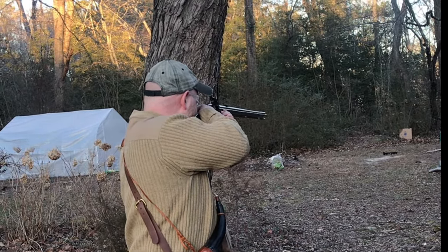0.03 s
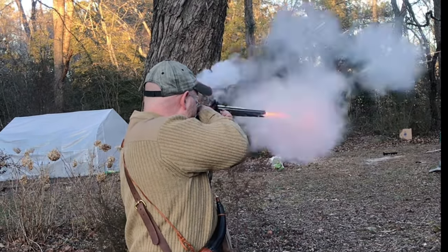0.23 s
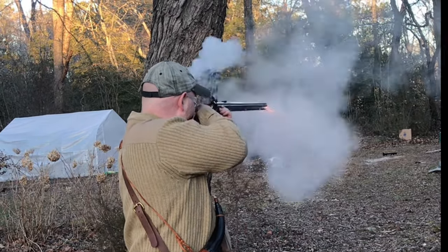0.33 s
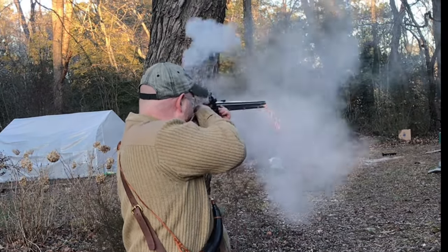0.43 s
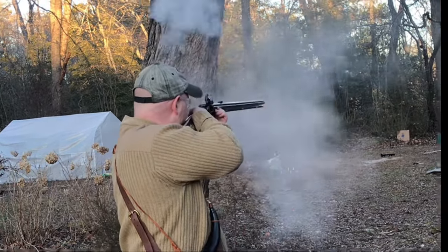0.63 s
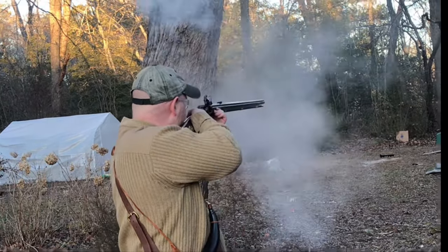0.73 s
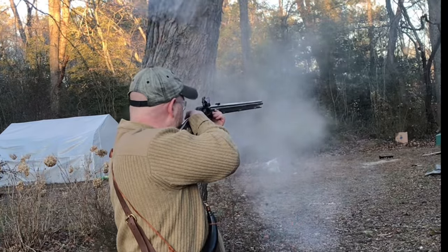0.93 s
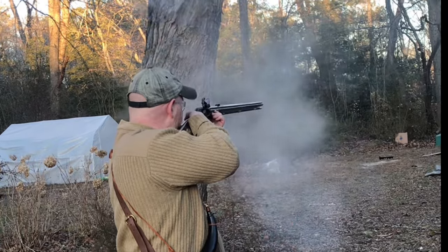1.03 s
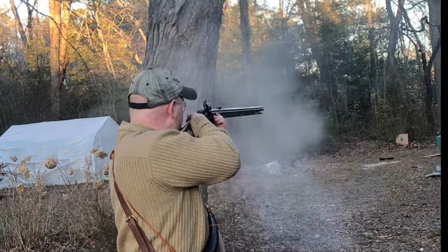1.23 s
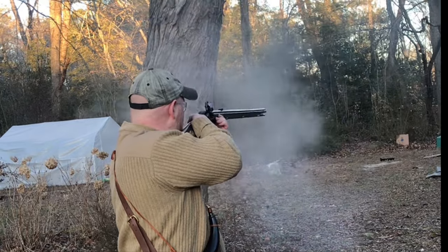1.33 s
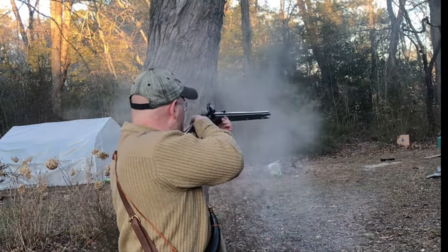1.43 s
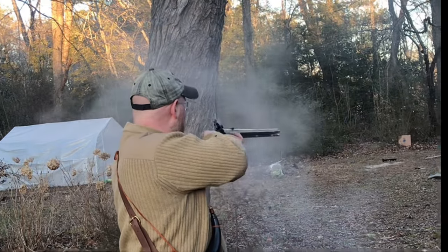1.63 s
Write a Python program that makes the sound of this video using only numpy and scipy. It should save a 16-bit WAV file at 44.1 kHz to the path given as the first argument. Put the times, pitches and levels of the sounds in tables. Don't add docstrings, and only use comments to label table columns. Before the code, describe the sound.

A flintlock rifle fires once in a wood clearing, close to a camera microphone. Faint traffic hums first. At 0.1 s the lock snaps with a bright steel clack and spark fizz; at 0.19 s priming hisses, and at 0.21 s a huge, slightly crushed bang erupts with low thumps. Hard slaps return around 0.31-0.37 s, then tree echoes dull and fade; dry leaves tick faintly after 1.2 s, clearest near 1.56 s.

```python
import sys
import numpy as np
from scipy import signal
from scipy.fft import rfft, irfft
from scipy.io import wavfile
from scipy.ndimage import uniform_filter1d

SR = 44100
rng = np.random.default_rng(int(sys.argv[2]) if len(sys.argv) > 2 else 0)


def makeup_ratio(level_db):
    decades = np.asarray(level_db, float) / 20
    return 10 ** decades


def store_wav(level_fs):
    pcm = np.round(np.clip(np.atleast_2d(level_fs), -1, 1) * 32767)
    wavfile.write(sys.argv[1], SR, pcm.T.astype(np.int16))


N = 74970
T = np.arange(N) / SR

# peak in seconds, level in
# dB, rise in seconds, time to fall 60 dB in seconds, centre in Hz.
NOISE_BURSTS = [(0.1870, -25.5, 0.0002, 0.018, 9000), (0.1896, -33, .0005, 0.016, 7010),
                (0.1942, -30.5, .0006, 0.022, 11000), (.1875, -38, .0005, .06, 2000),
                (.2020, -33, .003, .04, 720), (0.1973, -23.5, .002, 0.033, 2500),
                (.2105, -7, 0.0017, 0.028, 8000), (0.213, -11, 0.0017, 0.028, 8990),
                (0.2190, -10, .003, .025, 2200), (0.217, -13, 0.0025, 0.02, 5000),
                (.2285, -17, .0008, 0.025, 12000), (.2330, -15, .001, .015, 9000),
                (.2470, -20, .003, .06, 8700), (.2570, -20.5, .003, .08, 7000),
                (.2750, -25, .004, 0.141, 7000), (.3000, -31, .004, .05, 11000),
                (.0953, -33, 0.00023, .09, 8700), (.1120, -36, 0.0033, .2, 3200),
                (.3100, -23, .012, .2, 1500), (0.28, -29, .001, .03, 9000), (.4600, -35, .02, .3, 350),
                (.3000, -27, .02, .3, 200), (0.23, -14, .002, 0.03, 3200), (0.26, -16, 0.0028, 0.046, 2800),
                (.2600, -13, .004, 0.05, 1860), (.2900, -19, .006, 0.073, 2000),
                (0.27, -12, 0.0012, 0.015, 950), (0.3018, -21.5, 0.0024, 0.044, 4000),
                (0.33, -19.5, 0.0042, 0.059, 750), (0.31, -15, 0.0008, 0.05, 1700),
                (0.35, -22, 0.0013, 0.032, 1100), (0.34, -25, 0.0023, 0.017, 1600),
                (.2300, -17.5, 0.0036, .05, 850), (0.26, -17, .002, .03, 600),
                (.3710, -23, 0.00055, 0.018, 1600), (0.38, -26, .0008, 0.022, 1600),
                (0.18, -42.5, 0.0091, 0.057, 470), (0.36, -16, 0.00029, .018, 5500),
                (0.36, -16, .0003, 0.025, 1450), (0.3768, -22, 0.00059, 0.025, 1660),
                (.4170, -28, .002, .04, 1160), (0.46, -29.5, 0.0028, 0.088, 1430),
                (0.53, -33, .004, 0.22, 1400)]
# peak in seconds, level in dB, centre in Hz.
SHOCK_FRONTS = [(.2106, -4, 8000), (.2180, -4, 2200), (.2214, -1, 1700), (.2348, -7, 2500),
                (.3355, -10, 1200), (.3083, -11, 2000), (.3568, -3, 5500), (.3570, -12, 1800),
                (.3565, -13, 11000), (.3647, -9, 2200), (.3649, -12, 6500)]
# start in seconds, peak in dB, first pitch in Hz,
# glide in seconds, length in seconds.
THUMPS = [(.2075, -15, 330, .02, .006), (.2207, -7, 340, .009, .011), (.2365, -7.5, 175, .010, .021),
          (.2605, -7.5, 218, .010, .027), (.2280, -14, 235, .05, .009), (.2552, -12, 230, .02, .005),
          (.3241, -7, 160, .014, .015), (.1965, -26, 190, .02, .012), (.2880, -20, 100, .03, .025),
          (.3680, -32, 150, .05, .04), (.4620, -34, 330, .03, .02), (.5300, -32, 170, .03, .025),
          (.5450, -33, 320, .04, .02), (.4700, -34, 130, .05, .03), (1.185, -41, 200, .05, .03)]
# start in seconds, crack in dB, ring in dB, loudest ring in Hz.
LOCK_BLOWS = [(0.0957, -31, -48, 2200), (0.0962, -48, -40, 8700), (.1011, -6, -25, 1500),
              (.1025, -32, -24.5, 2900), (0.106, -24, -27, 6250), (.1070, -11.5, -27, 3096),
              (0.1093, -32, -29, 780), (0.1112, -16, -25.5, 12480), (.1140, -21, -27, 1427),
              (.1145, -34, -30, 14600), (.1150, -40, -33, 8700), (.1312, -40, -33, 2200),
              (0.1318, -25, -31, 12500), (0.102, -30, -27, 13500), (.1430, -27, -34, 12460),
              (.1450, -35, -37, 14600), (0.151, -30.5, -38, 12700), (.1550, -44, -43, 1427)]
# pitch in Hz, level in dB, time to fall 60 dB in seconds.
STEEL_TONES = [(780, 0, .045), (1100, -3, .02), (1427, 0, .055), (1800, -3, .02), (2200, -2, .04),
               (2850, 0, .018), (4000, -4, .02), (6250, 0, .015), (8750, -2, .03), (12500, 0, .015),
               (14600, -2, .03)]
# time in seconds, level in dB.
WOOD_ECHO = [(.205, -29), (0.216, -18.5), (.26, -20.5), (0.284, -25.5), (.317, -27.5), (.345, -30.5),
             (.387, -32), (.42, -35.5), (.48, -33.5), (.549, -32.5), (.653, -38), (.77, -41.5),
             (.89, -43.5), (1.05, -43.5), (1.19, -42.5), (1.29, -44.5), (1.4, -48.5), (1.7, -52.5)]
# frequency in Hz, level in dB per Hz.
WOOD_COLOUR = [(90, -5), (280, -3.5), (520, -9.5), (900, -0.5), (1550, -0.5), (2600, -11.5), (6500, -21.5),
               (16000, -40.5)]
# frequency in Hz, loss in dB per second of travel.
AIR_LOSS = [(60, 25), (180, 3.5), (450, -4), (1100, -1.5), (2500, 11), (4500, 25.5), (8000, 45.5),
            (16000, 80)]
# low edge in Hz, high edge in Hz, level in dB.
SIDE_BANDS = [(5900, 8300, -31), (12000, 14300, -39)]
# frequency in Hz, level in dB per Hz.
TRAFFIC_COLOUR = [(12, -46), (20, -17.5), (98, -6.5), (285, -20), (337, -38.5), (558, -27.5), (1090, -39),
                  (3000, -51), (16000, -57)]
# time in seconds, level in dB, centre in Hz.
LEAF_TICKS = [(1.2243, -65, 7000), (1.246, -70, 6500), (1.299, -64, 13000), (1.347, -62, 13000),
              (1.349, -66, 5490), (1.379, -65, 13900), (1.3865, -65, 12000), (1.398, -64, 12000),
              (1.4455, -61, 8000), (1.4765, -65, 5000), (1.489, -63.5, 12000), (1.509, -61, 11000),
              (1.525, -64.5, 12000), (1.561, -48, 6970), (1.568, -55, 6500), (1.576, -56, 13000),
              (1.589, -63, 9000), (1.632, -65, 12000), (1.639, -61, 9500), (1.697, -63, 9000)]

WHINE_S, WHINE_DB, WHINE_LEN_S = .3178, -19, .0055
WHINE_HZ, WHINE_FALL_HZ_S = 7200, 140000
CANOPY_DB, CANOPY_HZ, CANOPY_WIDTH_HZ = -52.5, 7400, 11000
CANOPY_ENDS_S, CANOPY_SAG_DB_S, CANOPY_T60_S = 0.57, 25, 0.47
DUCK_S, DUCK_DB, DUCK_RECOVER_S = .2, -8.5, 1.1
MIC_LOW_HZ = 55.5


def level(x, db):
    return x * makeup_ratio(db) / np.sqrt(np.mean(x ** 2))


def along(table, hz):
    table = np.array(table)
    return np.interp(np.log(hz), np.log(table[:, 0]), table[:, 1])


def ring(x, hz, width_hz):
    hz = min(hz, .44 * SR)
    return signal.lfilter(*signal.iirpeak(hz, hz / width_hz, fs=SR), x)


def band_filter(x, order, edge_hz, kind):
    return signal.sosfilt(signal.butter(order, edge_hz, kind, fs=SR, output="sos"), x)


def walk(rate):
    hold = int(SR / rate)
    steps = np.repeat(rng.standard_normal(N // hold + 1), hold)
    return 0.98 * uniform_filter1d(uniform_filter1d(steps, hold), hold)[:N]


def bands(x):
    spectrum = rfft(x)
    octaves = np.log2(np.maximum(np.arange(N // 2 + 1), 1) * SR / N)
    for centre in np.arange(9, 29) / 2:
        share = np.clip(1 - 2 * np.abs(octaves - centre), 0, 1)
        yield 2 ** centre, irfft(spectrum * share, N)


def swell(s, rise_s, t60_s):
    rise = np.exp(np.minimum(T - s, 0) / rise_s)
    fall = makeup_ratio(-60 * np.maximum(T - s, 0) / t60_s)
    return np.where(T < s, rise, fall)


def puff(s, db, rise_s, t60_s, hz, width):
    noise = ring(ring(rng.standard_normal(N), hz, hz * width), hz, hz * width)
    return swell(s, rise_s, t60_s) * level(noise, db)


def shock(s, db, hz, turns):
    phase = (T - s) * hz
    return makeup_ratio(db) * np.exp(-(phase / turns) ** 2) * np.cos(2 * np.pi * phase)


def thump(s, db, hz, glide_s, length_s):
    since = np.clip(T - s, 0, length_s)
    turns = hz * glide_s * np.arctan(since / glide_s)
    shape = np.sin(np.pi * (since / length_s) ** .5)
    return makeup_ratio(db) * shape * np.sin(2 * np.pi * turns)


def ball_whine():
    since = np.clip(T - WHINE_S, 0, WHINE_LEN_S)
    turns = (WHINE_HZ - WHINE_FALL_HZ_S * since / 2) * since
    return makeup_ratio(WHINE_DB) * np.sin(2 * np.pi * turns) * np.sin(np.pi * since / WHINE_LEN_S)


def blast():
    grain = makeup_ratio(1.6 * walk(900))
    out = grain * sum(puff(*row, width=1.47) for row in NOISE_BURSTS)
    out = out + sum(shock(*row, turns=.6) for row in SHOCK_FRONTS)
    out = out + puff(.218, db=-20.5, rise_s=0.0034, t60_s=0.31, hz=380.4, width=1.1)
    out = out + sum(thump(*row) for row in THUMPS)
    return out + ball_whine()


def steel_ring(since, top_hz):
    out = 0
    for hz, db, t60_s in STEEL_TONES:
        detune = 1 + .03 * rng.standard_normal()
        fade = makeup_ratio(db - 21 * abs(np.log2(hz / top_hz)) - 60 * since / t60_s)
        out = out + fade * np.sin(2 * np.pi * hz * detune * since)
    return out


def lock():
    out = puff(.102, db=-31, rise_s=0.00093, t60_s=0.32, hz=5000, width=4.2)
    for s, db, ring_db, top_hz in LOCK_BLOWS:
        since = np.maximum(T - s, 0)
        tones = steel_ring(since, top_hz)
        scrape = (T >= s) * makeup_ratio(-14 - 60 * since / .035) * ring(rng.standard_normal(N), 3500, 14000)
        crack = shock(s + .00018, 0, hz=7900, turns=0.57)
        out += makeup_ratio(ring_db + 4 * walk(700)) * tones
        out += makeup_ratio(db) * (crack + scrape)
    return band_filter(out, 3, 600, "high")


def wood():
    trunks_per_s, spread_db, loudest_db = 5000, 2.5, 9
    colour_at_s, air_growth = 0.51, 1.094
    chance, side, size = rng.random((3, N))
    click_db = np.minimum(-spread_db * np.log(size + 1e-9), loudest_db)
    clicks = (chance < trunks_per_s / SR) * np.sign(side - .5) * makeup_ratio(click_db)
    echo_s, echo_db = np.transpose(WOOD_ECHO)
    start = echo_s[0]
    travel = np.maximum(T - start, 0) ** air_growth - (colour_at_s - start) ** air_growth
    out, plain = 0, 0
    for hz, band in bands(clicks + 0.24 * rng.standard_normal(N)):
        colour_db = along(WOOD_COLOUR, hz)
        out = out + band * makeup_ratio(colour_db - along(AIR_LOSS, hz) * travel + 1.43 * walk(25))
        plain = plain + band * makeup_ratio(colour_db)
    gate = np.clip((T - start) / .004, 0, 1)
    return out / np.std(plain) * makeup_ratio(np.interp(T, echo_s, echo_db) + 2.0) * gate


def canopy():
    past_end = T - CANOPY_ENDS_S
    db = np.where(past_end < 0, -CANOPY_SAG_DB_S * past_end, -60 * past_end / CANOPY_T60_S)
    hiss = ring(rng.standard_normal(N), CANOPY_HZ, CANOPY_WIDTH_HZ)
    hiss = ring(hiss, CANOPY_HZ, CANOPY_WIDTH_HZ)
    return (T > DUCK_S) * level(hiss, CANOPY_DB) * makeup_ratio(db + 1.49 * walk(30))


def side_fizz():
    shape = np.sin(np.pi * np.clip((T - .2645) / .0464, 0, 1)) ** 2
    out = 0
    for low_hz, high_hz, db in SIDE_BANDS:
        out = out + level(band_filter(rng.standard_normal(N), 8, (low_hz, high_hz), "band"), db)
    return shape * out


def traffic():
    slow = walk(3)
    duck_db = DUCK_DB * (T > DUCK_S) * np.exp(-np.maximum(T - DUCK_S, 0) / DUCK_RECOVER_S)
    plain, ducked = 0, 0
    for hz, band in bands(rng.standard_normal(N)):
        layer = band * makeup_ratio(along(TRAFFIC_COLOUR, hz) + 0.5 * slow + 3.7 * walk(13))
        plain = plain + layer
        ducked = ducked + layer * makeup_ratio(duck_db * (1 + 0.18 * np.log2(hz / 100)))
    hum = ducked * makeup_ratio(-44.5) / np.std(plain)
    drone_turns = 88 * np.cumsum(1 + .04 * slow) / SR
    drone = makeup_ratio(-49 + duck_db + 2.5 * slow) * np.sin(2 * np.pi * drone_turns)
    return band_filter(hum + drone, 4, MIC_LOW_HZ, "high")


def leaves():
    ticks = sum(puff(s, db, 0.00033, .02, hz, width=1.0) for s, db, hz in LEAF_TICKS)
    grit = rng.standard_normal(N) * makeup_ratio(2.7 * walk(150))
    grow = np.clip((T - 1.0) / .4, 0, 1)
    return ticks + grow * level(ring(grit, 7000, 14000), -74)


def scene():
    mono = blast() + lock() + wood() + canopy() + traffic() + leaves()
    return mono + side_fizz() * np.array([[1], [-1]])


def low_pass(x):
    return signal.sosfilt(signal.butter(12, 16970, fs=SR, output="sos"), x)


def record(dry):
    limit = .98
    x = limit * np.tanh(dry / limit)
    x = signal.sosfilt(signal.ellip(8, .2, 60, 15800, fs=SR, output="sos"), x)
    x = band_filter(x, 1, MIC_LOW_HZ * 0.65, "high")
    return low_pass(x)


dry = scene()
out = record(dry)
store_wav(out)
```